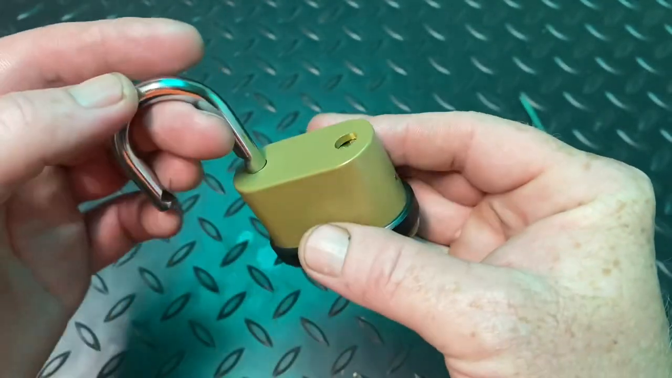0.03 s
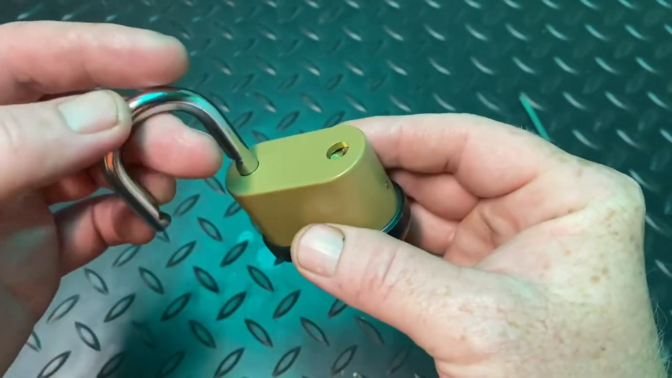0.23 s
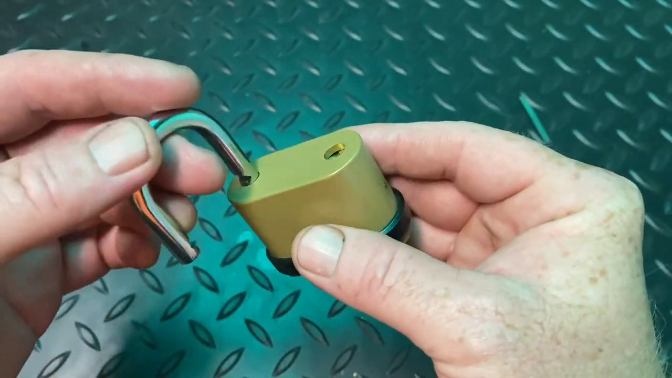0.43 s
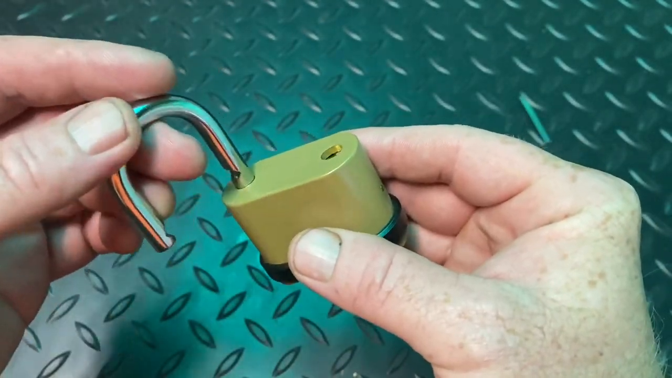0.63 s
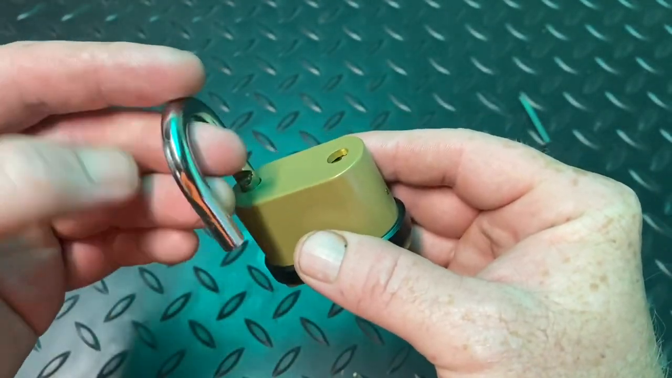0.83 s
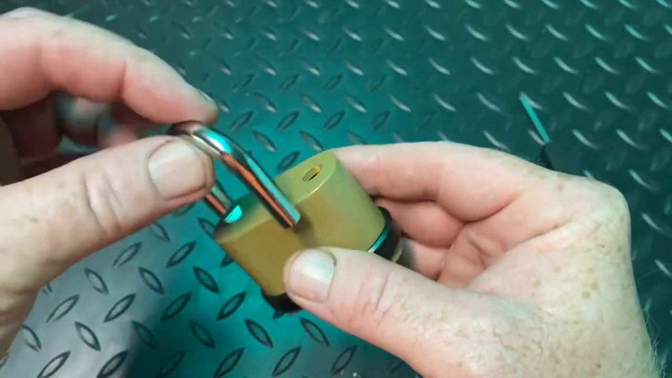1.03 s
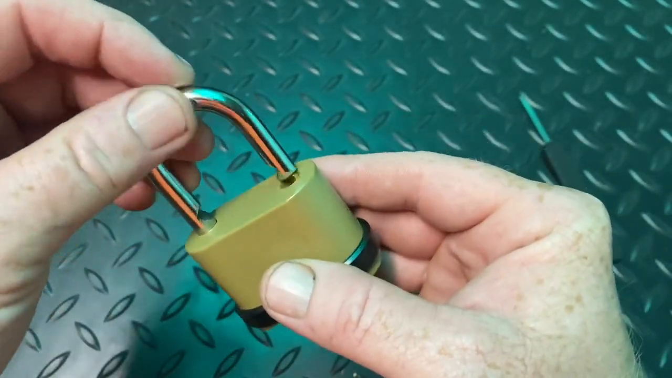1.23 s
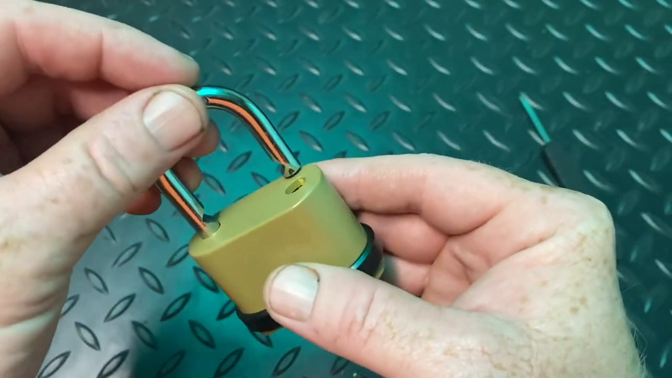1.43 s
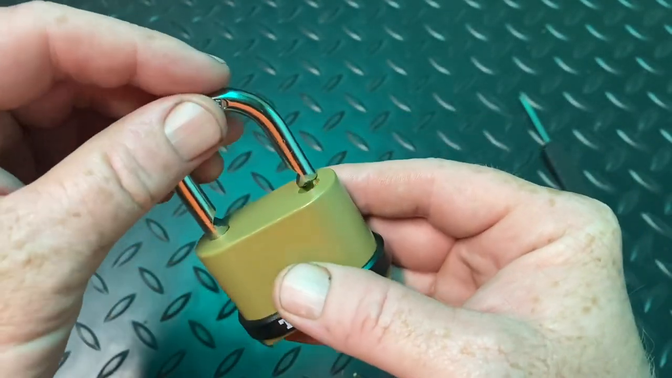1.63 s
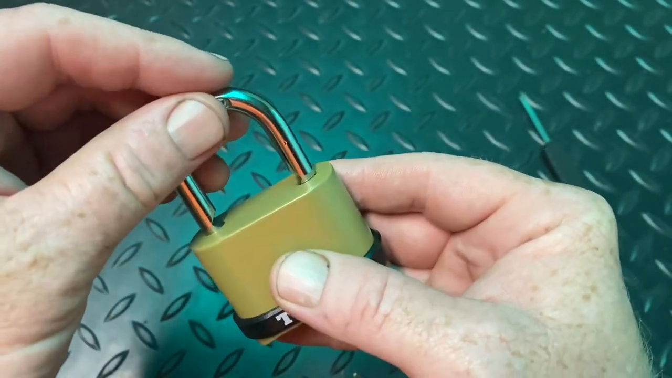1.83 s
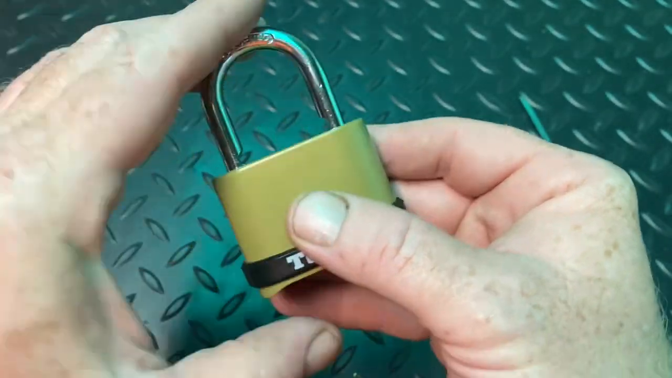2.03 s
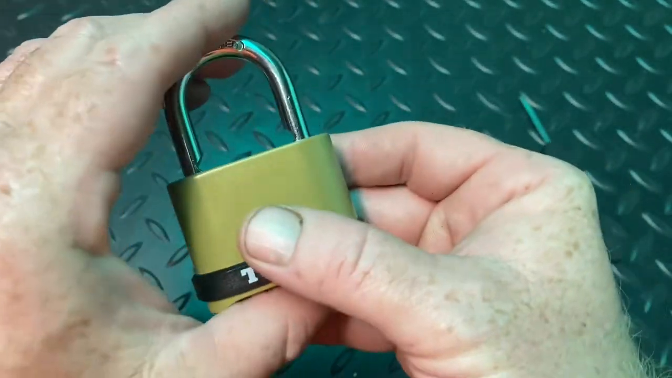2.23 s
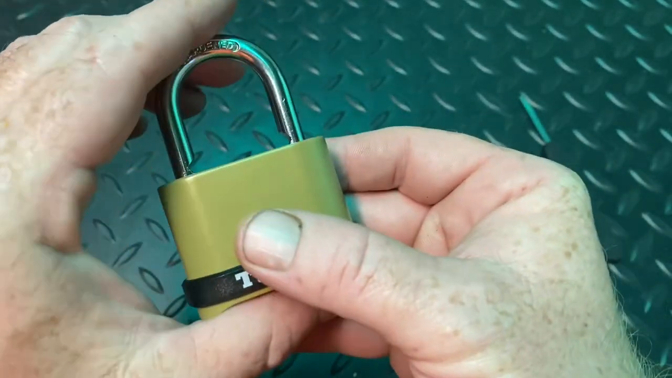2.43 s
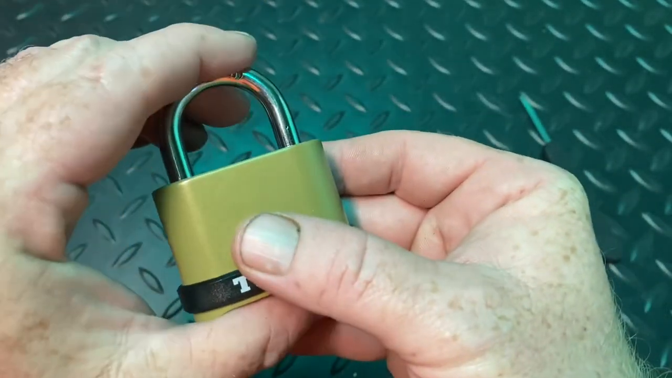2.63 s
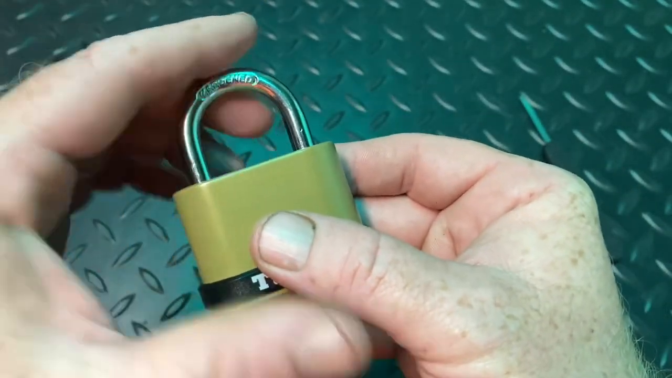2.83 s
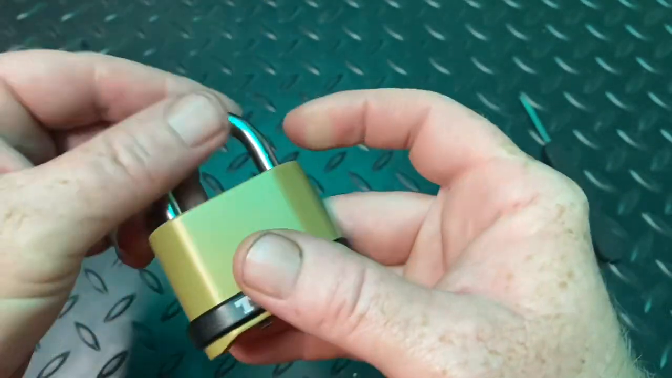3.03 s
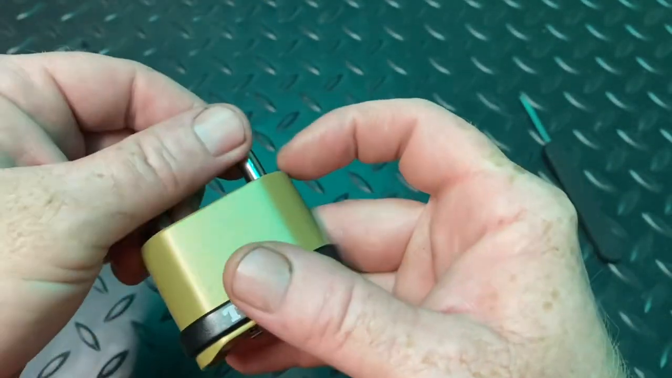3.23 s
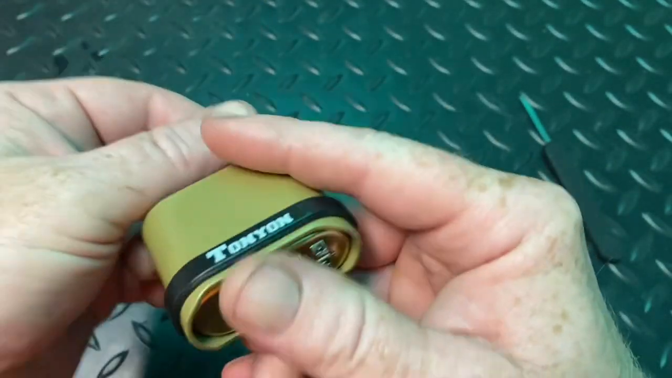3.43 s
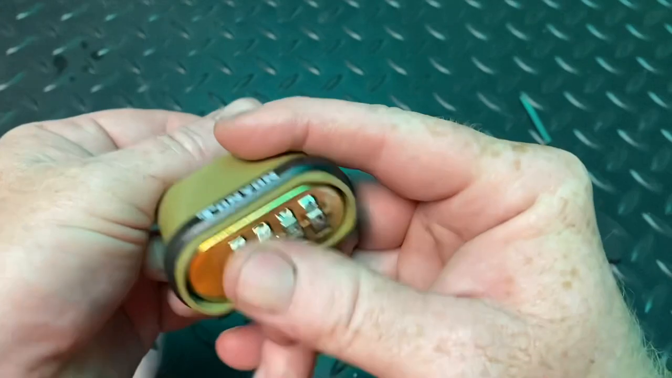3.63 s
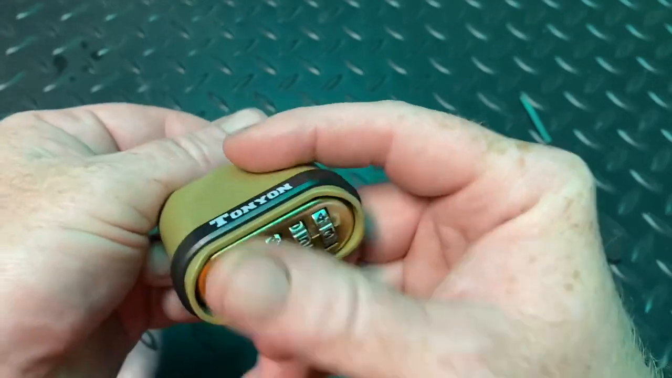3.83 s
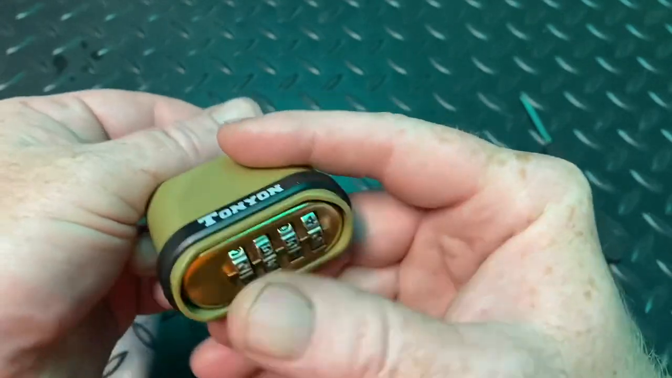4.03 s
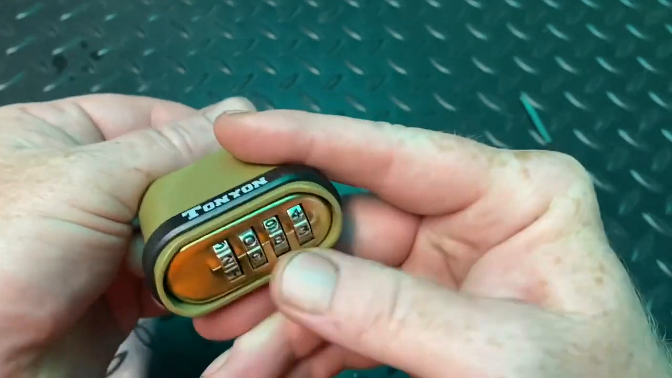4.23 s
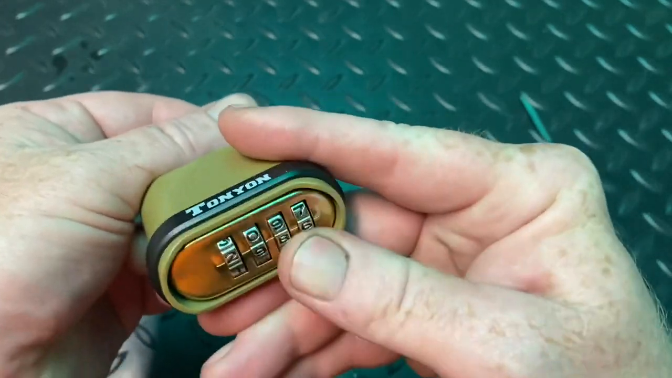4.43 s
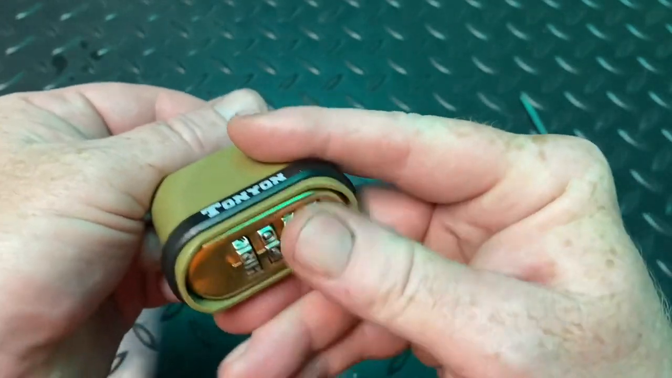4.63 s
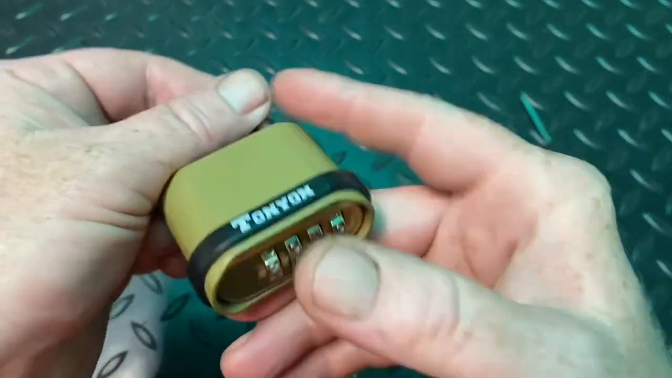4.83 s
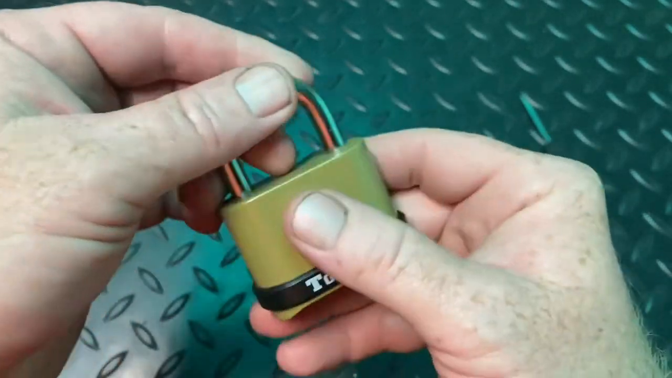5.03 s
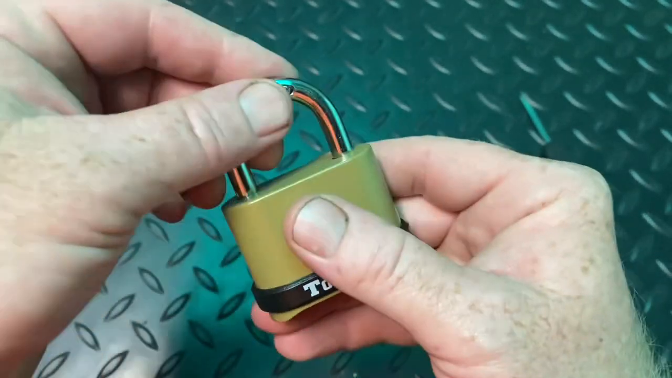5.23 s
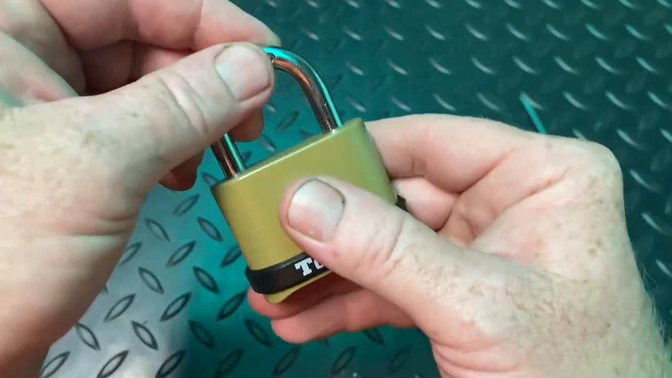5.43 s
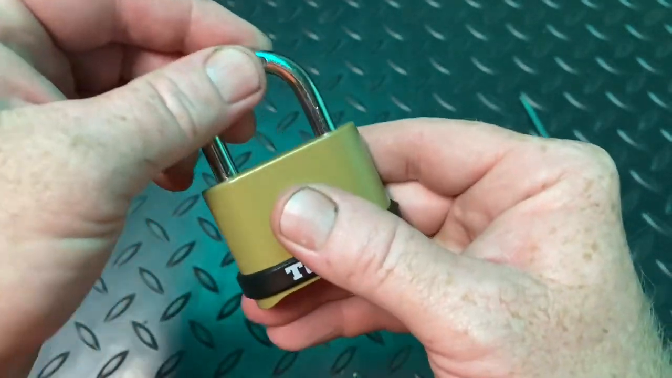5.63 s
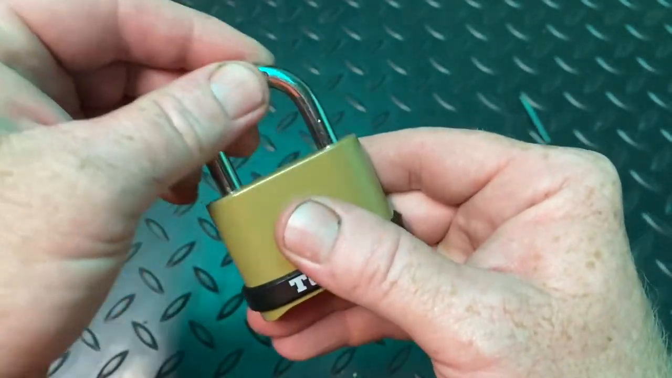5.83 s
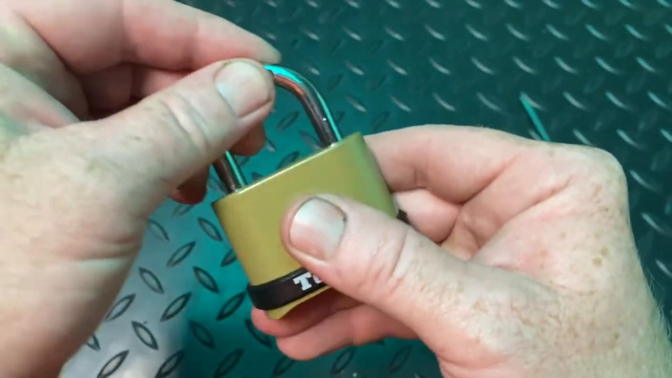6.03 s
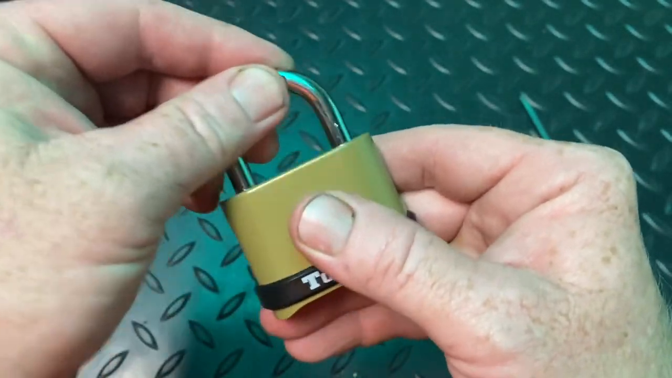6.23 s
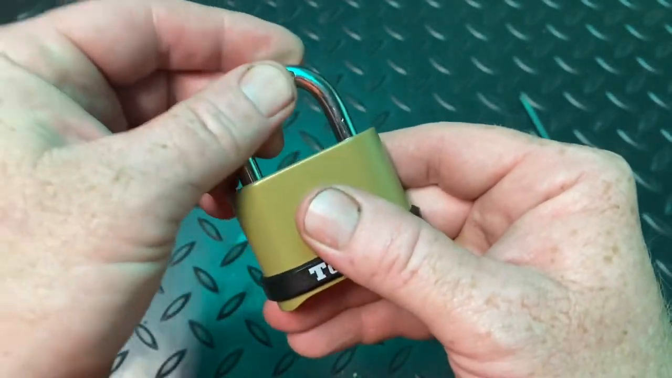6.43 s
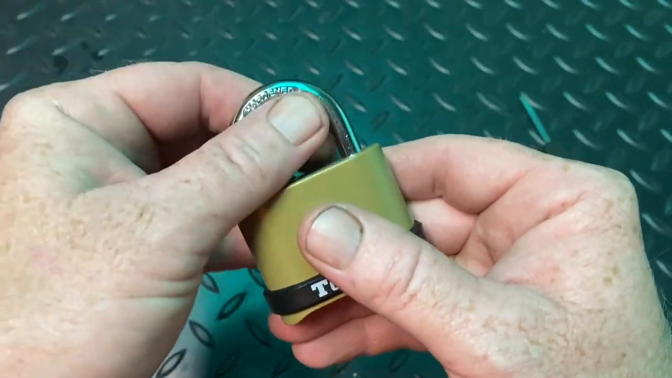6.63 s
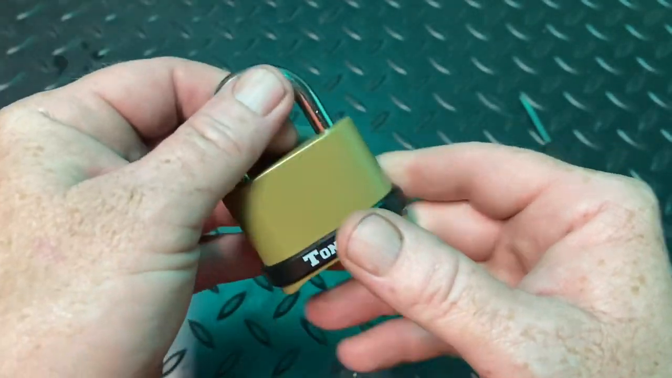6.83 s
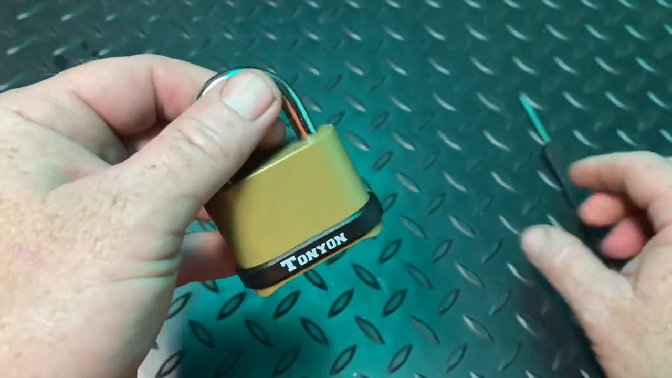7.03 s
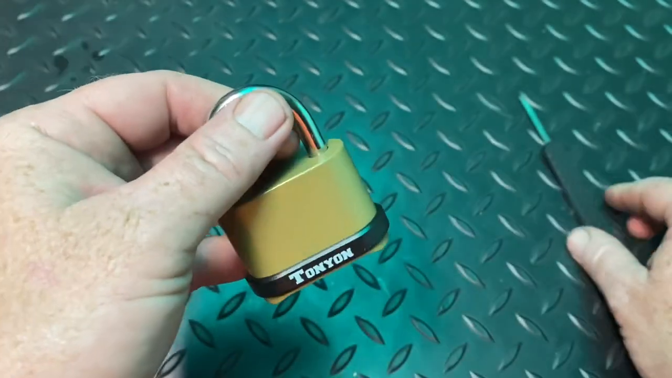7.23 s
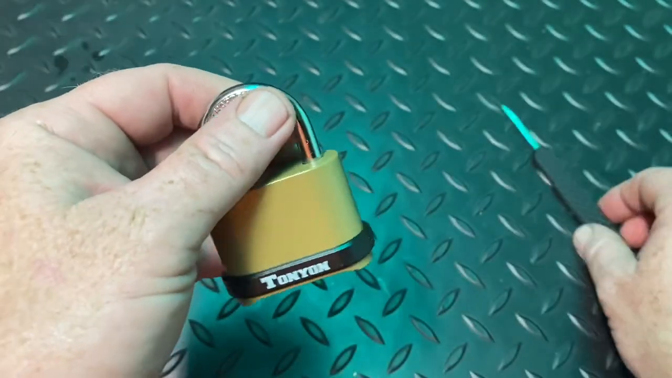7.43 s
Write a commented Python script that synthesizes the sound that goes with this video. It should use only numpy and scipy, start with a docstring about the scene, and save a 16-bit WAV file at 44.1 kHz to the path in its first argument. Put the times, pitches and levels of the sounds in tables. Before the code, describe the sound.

Close, dry stereo pickup of a padlock handled in a small workshop. The loose shackle knocks and scrapes lightly, is seated with crisp clicks and snapped shut with the loudest clack. Number wheels tick in quick uneven bursts, then the locked shackle is tugged in sharp metallic rattles. A few faint knocks end it. A soft low hum runs throughout, with barely audible falling bird chirps.

```python
"""A combination padlock is handled close to the microphone in a small workshop.
Ventilation hums throughout as noise through duct resonances; now and then fingers rub the lock as filtered grit.
The loose shackle slides and knocks, faint falling chirps join in, and the shackle is set home and snapped shut.
A thumb spins the ticking number wheels, then the locked shackle is tugged in bursts of three touches.
A few last shackle knocks follow; metal sounds are gritty noise ringing the modes of each part.
"""
import sys
import numpy as np
from scipy import signal
from scipy.fft import rfft, irfft
from scipy.io import wavfile

SR = 44100
rng = np.random.default_rng(int(sys.argv[2]) if len(sys.argv) > 2 else 0)


def dump(signal):
    """Clip the signal to [-1, 1] and save it as 16-bit WAV at the path in sys.argv[1]."""
    limited = np.clip(np.atleast_2d(signal).T, -1, 1)
    pcm = np.round(limited * 32767).astype(np.int16)
    wavfile.write(sys.argv[1], SR, pcm)


N = 330750

# Duct resonances of the ventilation: [f/Hz, nominal width/Hz, rms level/dB]
DUCT_RESONANCES = [(57.34, 11, -37.5), (94.5, 21, -44.5), (207.5, 12, -46), (235.5, 26, -51.5),
                   (361, 39, -50.5), (396, 10, -62.5), (490.4, 22, -56.5)]
# Spectral shape of the air rush under the hum: [f/Hz, relative density level/dB]
AIR_SHAPE = [(20, -34.5), (40, -8.5), (70, 5), (125, -1), (180, -2.5), (260, -3.5), (310, -13.5),
             (480, -11), (550, -19), (750, -24), (1200, -31), (4200, -41), (5500, -50.5), (12000, -58),
             (16000, -73.5)]
# Likeness of the two channels in the ventilation: [f/Hz, correlation]
CHANNEL_LIKENESS = [(30, 1), (125, 0.91), (300, 0.94), (600, 0.33), (1200, 0.082), (5000, 0.12)]
# Fingers sliding over the lock: [t/s, length/s, level/dB]
FINGER_RUBS = [(0.0, 0.17, -77.5), (3.217, 0.1, -77.5), (3.351, 0.15, -69.5), (4.083, 0.099, -60.5),
               (4.609, 0.022, -54), (4.922, 0.14, -73), (6.577, 0.34, -76.5), (7.138, 0.19, -72)]
# Knocks of the loose shackle in its hole:
# [t/s, level/dB, brightness/dB per octave, slide before the knock/s (scrapes when over 0.015)]
LOOSE_KNOCKS = [(0.3673, -34, 1, 0.024), (0.4845, -50.5, -2, 0), (0.5026, -44, 4, 0.0011),
                (0.5398, -27.5, 2, .022), (0.6929, -36.5, 0.5, .026), (0.8042, -45.5, -2, 0.03),
                (0.949, -35, 2.5, .027), (1.0605, -29, 3, 0.014), (1.092, -38.5, 0, 0.0021),
                (1.4732, -38, -4.5, 0), (1.8995, -52.5, -6, 0.002), (2.735, -54.5, -1.5, 0.082),
                (3.193, -55, -6, 0), (3.4518, -49.5, -5, 0), (6.3773, -35.5, 10, 0.0038),
                (6.3989, -39, 3.5, 0.0017), (6.7157, -57, -4, 0), (7.1426, -53.5, -2, 0.0031)]
# Falling bird chirps: [t/s, length/s, start f/Hz, fall/octaves per s, level/dB]
BIRD_CHIRPS = [(1.093, 0.028, 7500, 2.8, -56.5), (1.113, .028, 6050, 8, -50), (1.127, 0.028, 5300, 24, -54),
               (1.514, .11, 4460, 6.1, -64), (1.724, 0.11, 5280, 6.5, -68), (2.855, 0.11, 4490, 6.2, -67.5),
               (3.801, 0.14, 4800, 4.9, -64.5), (4.29, 0.045, 5220, 5.4, -70),
               (4.605, 0.1, 2373, 2.86, -62.5), (5.355, 0.087, 4710, 5.2, -64.5)]
# Shackle set into its hole, then pushed home until the latch snaps:
# [t/s, level/dB, contact length/s, brightness/dB per octave]
LATCH_CONTACTS = [(1.6577, -37, 0.0031, -9), (1.6618, -18, 0.0016, 3.5), (1.6698, -21.5, 0.00148, -1.5),
                  (2.455, -45.5, 0.0032, 0), (2.4918, -21, 0.0036, 7), (2.4978, -20, 0.0015, -5),
                  (2.5109, -12.5, 0.005, 0.9)]
# A wheel dropping into a detent: [t/s, level/dB]
DETENT_CLICKS = [(3.5997, -38), (3.6066, -27), (3.6355, -18), (3.6415, -19), (3.74, -38.5), (3.8498, -38),
                 (3.8708, -28), (3.9088, -23), (3.9371, -31), (3.9422, -24), (3.9793, -33), (3.9969, -39.5),
                 (4.1029, -45), (4.1551, -24), (4.2216, -37), (4.2857, -43.5), (4.334, -41.5),
                 (4.3548, -41), (4.3633, -29), (4.4219, -27.5), (4.4511, -46.5), (4.5721, -42.5),
                 (4.6445, -21), (4.6495, -24)]
# Thumb strokes that spin the wheels: [t/s, length/s, mid-stroke tick level/dB]
THUMB_STROKES = [(3.605, 0.042, -29), (3.876, .048, -35.5), (4.127, 0.043, -32.5), (4.37, 0.045, -41.5),
                 (4.63, 0.031, -35)]
# Locked shackle tugged to and fro; a hard pull stops dead, a slack return chatters:
# [t/s, first touch level/dB, time between touches/s, loss per touch/dB]
LOCKED_TUGS = [(4.94, -42, .006, 24), (5.318, -38.5, .013, 0), (5.461, -26, .006, 11),
               (5.5756, -34, 0.0079, 0.5), (5.6985, -22, 0.0033, 17), (5.7833, -45.5, 0.0077, 23),
               (5.805, -30.5, 0.0084, 5), (5.9191, -22.5, 0.0052, 17), (5.9993, -40.5, .006, 27),
               (6.0189, -32, 0.0077, 2), (6.1355, -22.5, .004, 13.5), (6.2147, -44.5, .006, 23.5),
               (6.2451, -29, 0.0077, 7.5)]

# Broad colour of each part's contacts: [f/Hz, level/dB]
LOOSE_CRACK = [(300, -17), (800, -22.5), (1300, 6.5), (2100, 4), (3500, 2), (4500, -0.5), (5600, 0),
               (7300, 1), (9000, -4.5), (11000, -8.5), (14000, -13), (16000, -19.5)]
LATCH_CRACK = [(300, -22.5), (700, -11.5), (1100, -5.5), (2200, -2), (5000, 3), (8000, 4.5), (10000, 1),
               (12000, 2.5), (16000, -7.5)]
WHEEL_CRACK = [(300, -32.5), (800, -13), (1400, -6.5), (2100, -11), (4000, -3), (7200, 2), (9500, -2.5),
               (12500, -2.5), (16000, -20.5)]
LOCKED_CRACK = [(300, -3), (750, -13), (1200, -5.5), (2100, -3.5), (4500, -2.5), (6800, 5.5), (9500, -1),
                (11000, -5.5), (12500, 0), (14700, -10), (16000, -23)]
# Ringing modes of each part: [f/Hz, level over the broad colour/dB, t60/s]
LOOSE_RING = [(1520, 5, .010), (2720, 4, .011), (3480, 6, .014), (5300, 3, .011), (15450, 8, .008)]
LATCH_RING = [(1602, 13, 0.02), (3640, 8.3, 0.11), (4300, 5, .012), (5800, 3, 0.01), (7115, 5.4, 0.018),
              (12100, 5, 0.0084), (12900, 5.3, 0.0082)]
WHEEL_RING = [(1400, 3, .008), (2720, 3, .008), (6400, 7, .012), (7540, 5, .014), (12330, 6, .016),
              (14900, 5, .008)]
LOCKED_RING = [(1350, 9, 0.0072), (1520, 7, 0.015), (5740, -1, .01), (7240, -1.5, 0.011),
               (12500, -13, 0.0096), (16000, 10.5, 0.0091)]

# Decay time of the workshop reverberation: [f/Hz, t60/s]
REVERB_DECAY = [(500, 0.55), (2000, .5), (6500, 0.46), (11000, 0.37), (16000, 0.2)]
# Relative colour of the workshop reverberation: [f/Hz, level/dB]
REVERB_COLOUR = [(500, -10), (2000, 6), (7000, -1.5), (9500, -9.5), (16000, 4)]
# The left port hears the lock's midrange louder: [f/Hz, left minus right level/dB]
PORT_BALANCE = [(500, 4), (1500, 3), (3000, 7), (5300, 2.5), (7000, 2.5), (8500, -0.5), (16000, 1)]
# The treble reaches the left port later: [f/Hz, phase by which left leads/rad]
PORT_LEAD = [(500, 1.5), (1450, 1.05), (2400, 1.5), (6500, 0.8), (7900, -1.73), (9600, -3.5), (12700, -8.5),
             (16500, -14.5)]
# The microphone's treble has two dips and a lift above them: [f/Hz, level/dB]
MIC_TREBLE = [(8100, 0), (9000, -7.5), (10000, 0.5), (12300, 0), (13300, -8), (14300, 6), (15400, 6),
              (16500, -5)]

AIR_DB = -44.5  # rms level of the air rush
RUB_TILT_DB = 5.5  # brightness of skin on metal, per octave
KNOCK_S, SLIDE_BELOW_KNOCK_DB = 0.0027, 18  # contact length; how much softer the slide is
CLICK_S, CLICK_DOUBLES_DB = 0.00081, -30  # contact length of a faint click; level at which it doubles
CLICK_NEUTRAL_DB, CLICK_BRIGHTENING = -30.5, 0.5  # level of neutral colour; dB per octave gained per dB
RATTLE_PER_S, RATTLE_SCATTER_DB, RATTLE_SWELL_DB = 150, 5, 3.5  # ticks, growing over the stroke
AXLE_BELOW_DB, AXLE_TILT_DB = 4, 1  # axle scrape: level under the ticks; brightness per octave
TUG_S, TUG_NEUTRAL_DB, TUG_BRIGHTENING = 0.0023, -26.5, 0.24  # contact length, then as for clicks
TAKE_UP_S, TAKE_UP_BELOW_DB = 0.01, 26.5  # scrape before each tug: length; how much softer
CUTOFF_HZ = 16600  # top of the recorded band


def from_db(db):
    """Decibels to gain."""
    return 10 ** (np.asarray(db) / 20)


def rms_one(x):
    """Scale to rms 1."""
    return x / np.sqrt(np.mean(x ** 2) + 1e-30)


def energy_one(x):
    """Scale each channel to energy 1."""
    return x / np.sqrt(np.sum(x ** 2, axis=-1, keepdims=True) + 1e-30)


def at_hz(points, hz):
    """Read a table on a log-frequency axis."""
    known_hz, values = np.transpose(points)
    return np.interp(np.log(np.maximum(hz, 1)), np.log(known_hz), values)


def bins(size):
    """Frequencies of a real FFT."""
    return np.arange(size // 2 + 1) * SR / size


def causal(gain):
    """Minimum-phase response with this magnitude: nothing sounds before the blow."""
    cepstrum = irfft(np.log(gain))
    half = len(cepstrum) // 2
    folded = np.r_[cepstrum[0], 2 * cepstrum[1:half], cepstrum[half], np.zeros(half - 1)]
    return np.exp(rfft(folded))


def add(track, s, sound):
    """Mix a sound into a stereo track at time s."""
    start = max(round(s * SR), 0)
    track[:, start:start + sound.shape[-1]] += sound[..., :max(N - start, 0)]


def convolve(x, response):
    """Pass each channel through its own response."""
    return signal.fftconvolve(x, response, axes=-1)[:, :N]


def ventilation():
    """Turbulent air, shaped by narrow duct resonances; alike in both channels in the bass."""
    hz = bins(N)
    power = (from_db(AIR_DB) * energy_one(from_db(at_hz(AIR_SHAPE, hz)))) ** 2
    for centre, width, level_db in DUCT_RESONANCES:
        resonance = 1 / (1 + ((hz - centre) / (0.59 * width)) ** 2)
        power = power + (from_db(level_db) * energy_one(resonance)) ** 2
    mid, side = rfft(rng.standard_normal((2, N))) * np.sqrt(power * len(hz))
    alike = np.clip(at_hz(CHANNEL_LIKENESS, hz), -1, 1)
    shared = np.sqrt((1 + alike) / 2) * mid
    opposed = np.sqrt((1 - alike) / 2) * side * [[1], [-1]]
    return irfft(shared + opposed, N)


def body(colour, modes, size=4096):
    """Frequency response of a metal part: a broad crack coloured by its ringing modes."""
    hz = bins(size)
    response = causal(from_db(at_hz(colour, hz)))
    for mode_hz, height_db, t60 in modes:
        half_width = np.log(1000) / (2 * np.pi * t60)
        resonance = 1 / (1 + 1j * (hz - mode_hz) / half_width)
        response = response * (1 + (from_db(height_db) - 1) * resonance)
    return response


def hardness(tilt_db, size):
    """A harder contact favours the treble over the midrange."""
    octaves = np.log2(np.clip(bins(size), 1200, 8500) / 4000)
    return causal(from_db(tilt_db * octaves))


def grit(spread_db, size):
    """Micro-impacts of rough surfaces: noise whose strength jumps every third of a millisecond."""
    strength = np.repeat(rng.standard_normal(size // 16 + 1), 16)[:size]
    return rng.standard_normal(size) * from_db(spread_db * np.clip(strength, -2, 2))


def scatter(delay_s, t60, size):
    """Dense reflections from things nearby, different in each channel."""
    t = np.arange(size) / SR - delay_s
    decay = (t > 0) * from_db(-60 * np.maximum(t, 0) / t60)
    return energy_one(rng.standard_normal((2, size)) * decay)


def near_path(size, hands_db=-7, bench_db=-10.5, bench_t60=0.068):
    """Direct sound plus reflections off hands and bench, drawn afresh each time as the lock is moved."""
    hands = from_db(hands_db) * scatter(0.0001, t60=0.0055, size=size)
    bench = from_db(bench_db) * scatter(0.0039, t60=bench_t60, size=size)
    path = hands + bench
    path[:, 0] += 1  # direct sound
    return rfft(path)


def strokes(events, part, spread_db, fade, size=16384):
    """Sliding feeds a stream of micro-impacts into a part."""
    out = np.zeros((2, N))
    for s, length, level_db, tilt_db in events:
        count = round(length * SR)
        stream = grit(spread_db, size=size)[:count] * signal.windows.tukey(count, fade)
        force = rfft(stream, size) * hardness(tilt_db, size=size)
        rasp = irfft(force * rfft(irfft(part), size) * near_path(size=size))
        add(out, s, from_db(level_db) * np.sqrt(count) * energy_one(rasp))
    return out


def scrapes(events):
    """Rough rubbing heard through the loose shackle's body."""
    return strokes(events, body(LOOSE_CRACK, LOOSE_RING), spread_db=10.0, fade=0.26)


def finger_rubs():
    """Skin sliding over metal feeds bright grit into the shackle."""
    return scrapes([(s, length, db, RUB_TILT_DB) for s, length, db in FINGER_RUBS])


def contacts(events, part, spread_db, settle_s, slide_db, slide_s=0.0055, size=4096):
    """Each contact is a brief slide, then a short chatter that sets the part ringing."""
    out = np.zeros((2, N))
    t = np.arange(size) / SR - slide_s
    slide = from_db(slide_db) * (1 + t / slide_s)
    for s, level_db, length, tilt_db in events:
        chatter = np.exp(-np.maximum(t - length, 0) / settle_s)
        pressure = np.where(t < 0, slide, chatter)
        force = rfft(grit(spread_db, size=size) * pressure) * hardness(tilt_db, size=size)
        click = irfft(force * part * near_path(size=size))
        add(out, s - slide_s, from_db(level_db) * np.sqrt(abs(length) * SR) * energy_one(click))
    return out


def shackle_swings():
    """The loose shackle knocks in its hole, with a scrape ahead of the longer slides."""
    hits = [(s, db, KNOCK_S, tilt) for s, db, tilt, _ in LOOSE_KNOCKS]
    slides = [(s - slide, slide, db - SLIDE_BELOW_KNOCK_DB, tilt)
              for s, db, tilt, slide in LOOSE_KNOCKS if slide > 0.015]
    loose = body(LOOSE_CRACK, LOOSE_RING)
    knocks = contacts(hits, loose, spread_db=9.0, settle_s=0.00051, slide_db=-23)
    return knocks + scrapes(slides)


def birds(waver=0.015, overtone_db=-24, size=16384):
    """Raspy chirps that fall at a steady rate with a slight waver, swelling and fading."""
    out = np.zeros((2, N))
    flutter_filter = signal.butter(2, 450, fs=SR, output="sos")
    for s, length, start_hz, fall, level_db in BIRD_CHIRPS:
        u = np.linspace(0, 1, round(length * SR))  # progress through the chirp
        wobble = np.interp(u, np.linspace(0, 1, 20), rng.standard_normal(20))
        hz = start_hz * 2 ** (-fall * length * u) * (1 + waver * wobble)
        flutter = rms_one(signal.sosfilt(flutter_filter, rng.standard_normal(size)))[:len(u)]
        phase = 2 * np.pi * np.cumsum(hz) / SR
        tone = np.sin(phase) + from_db(overtone_db) * np.sin(2 * phase)
        voice = (1 + flutter) * tone  # full-depth rasp
        add(out, s, from_db(level_db) * rms_one(np.sin(np.pi * u) * voice))
    return out


def latch_snaps():
    """The shackle meets its hole and the latch snaps, ringing the latch modes."""
    latch = body(LATCH_CRACK, LATCH_RING)
    return contacts(LATCH_CONTACTS, latch, spread_db=2.0, settle_s=0.0005, slide_db=-24)


def wheel_dialling(count=24):
    """A spun wheel scrapes and ticks unevenly; harder clicks are brighter and chatter longer."""
    ticks = list(DETENT_CLICKS)
    for s, length, db in THUMB_STROKES:
        after = (np.arange(count) + rng.uniform(0, 0.5, count)) / RATTLE_PER_S
        swell = RATTLE_SWELL_DB * (after / length - 0.5)
        levels = db + swell + RATTLE_SCATTER_DB * rng.uniform(-1.1, 1, count)
        ticks += [(s + t, level) for t, level in zip(after, levels) if t < length]
    clicks = []
    for s, db in ticks:
        contact_s = CLICK_S * (1 + from_db(db - CLICK_DOUBLES_DB))
        clicks.append((s, db, contact_s, CLICK_BRIGHTENING * (db - CLICK_NEUTRAL_DB)))
    spins = [(s, length, db - AXLE_BELOW_DB, AXLE_TILT_DB) for s, length, db in THUMB_STROKES]
    wheel = body(WHEEL_CRACK, WHEEL_RING)
    detents = contacts(clicks, wheel, spread_db=14, settle_s=0.00007, slide_db=-10.5)
    return detents + strokes(spins, wheel, spread_db=5, fade=0.15)


def shackle_tugs(count=3):
    """Each tug takes up the slack, hits the latch and rebounds; harder touches are brighter."""
    touches, take_ups = [], []
    for s, first_db, gap, loss_db in LOCKED_TUGS:
        take_ups.append((s - TAKE_UP_S, TAKE_UP_S, first_db - TAKE_UP_BELOW_DB, 0))
        for k in range(count):
            db = first_db - k * loss_db
            touches.append((s + k * gap, db, TUG_S, TUG_BRIGHTENING * (db - TUG_NEUTRAL_DB)))
    locked = body(LOCKED_CRACK, LOCKED_RING)
    tugs = contacts(touches, locked, spread_db=5.0, settle_s=0.00051, slide_db=-13)
    return tugs + scrapes(take_ups)


def padlock():
    """Everything the lock and the fingers on it sound, in order of first appearance."""
    return finger_rubs() + shackle_swings() + latch_snaps() + wheel_dialling() + shackle_tugs()


def workshop(size=32768, count=10):
    """Late reverberation: each band of noise dies at its own rate."""
    t, hz = np.arange(size) / SR, bins(size)
    noise = rfft(rng.standard_normal((2, size))) * from_db(at_hz(REVERB_COLOUR, hz))
    centres = np.geomspace(500, 16000, count)
    tail = 0
    for centre, member in zip(centres, np.eye(count)):
        band = irfft(noise * at_hz(np.c_[centres, member], hz))  # overlapping triangular bands
        tail = tail + band * from_db(-60 * t / at_hz(REVERB_DECAY, centre))
    return energy_one(tail * np.clip(t / 0.004 - 1, 0, 1))  # fades in from 4 to 8 ms


def ports(x):
    """The two microphone ports hear the lock with their own colour and phase."""
    hz = bins(N)
    lean = from_db(at_hz(PORT_BALANCE, hz) / 2) * np.exp(0.5j * at_hz(PORT_LEAD, hz))
    return irfft(rfft(x) * np.array([lean, 1 / lean]), N)


def scene():
    """The lock is near and dry; the birds add an unattenuated reverberation to their direct sound."""
    lock, room, chirps = padlock(), workshop(), birds()
    close = ports(lock) + from_db(-21.0) * convolve(lock, room)
    outside = chirps + convolve(chirps, room)
    return close + outside + ventilation()


def record(dry):
    """The microphone colours the treble, the deepest bass rolls off and the top is cut steeply."""
    mic = irfft(causal(from_db(at_hz(MIC_TREBLE, bins(size=1024)))))
    coloured = convolve(dry, mic[None])
    bass_cut = signal.butter(4, 36, "high", fs=SR, output="sos")
    top_cut = signal.ellip(10, 0.1, 80, CUTOFF_HZ, fs=SR, output="sos")
    return signal.sosfilt(top_cut, signal.sosfilt(bass_cut, coloured))


dry = scene()
out = record(dry)
dump(out)
```